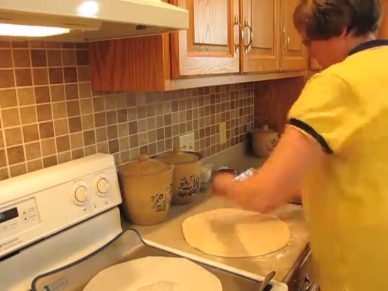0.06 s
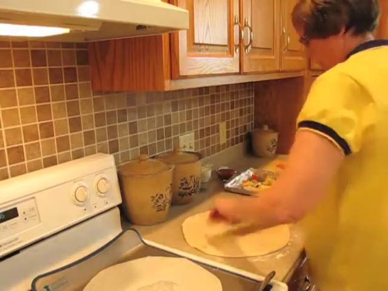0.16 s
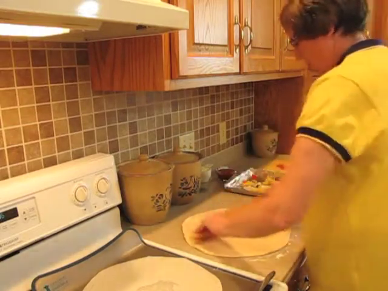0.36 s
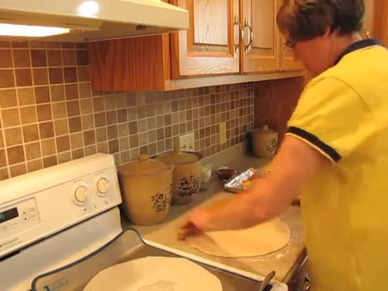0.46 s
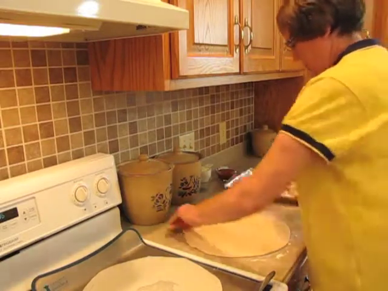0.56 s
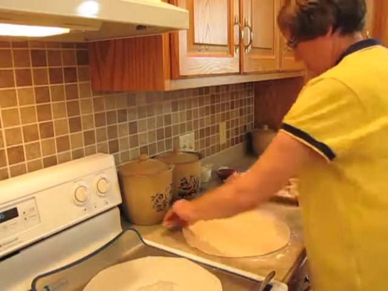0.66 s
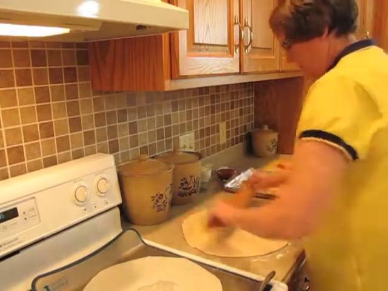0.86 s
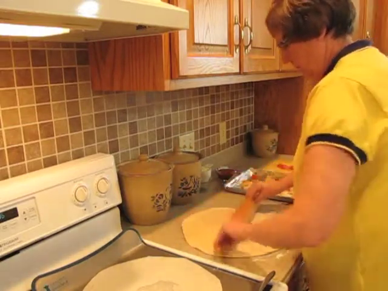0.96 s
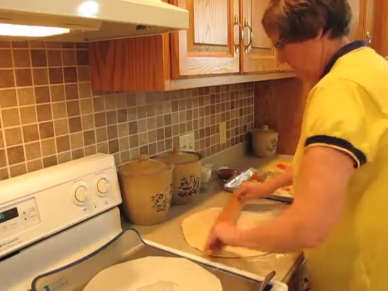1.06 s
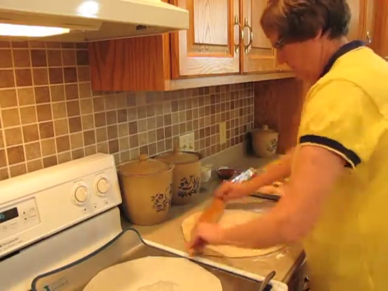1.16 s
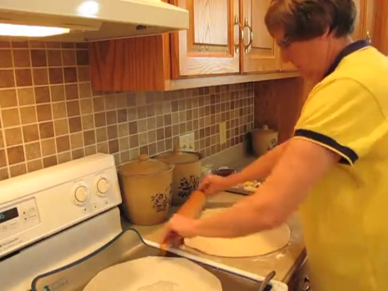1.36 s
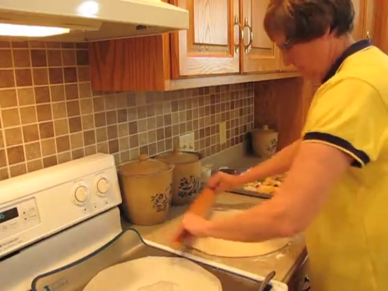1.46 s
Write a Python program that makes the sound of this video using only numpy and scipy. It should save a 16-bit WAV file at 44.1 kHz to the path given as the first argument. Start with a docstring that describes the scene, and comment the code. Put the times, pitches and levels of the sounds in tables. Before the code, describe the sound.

A wooden rolling pin rattles lightly at its loose handles from 0.03 to 0.13 seconds, then hits the counter with a loud, sharp knock at 0.24. Quiet grainy rolling follows with faint ticks and a clack near 0.66. After a lull, it lands softly on dough with a handle clatter at 1.0, then rolls with low rumble, rapid ticks and clacks until about 1.33, fading. Short tiled-kitchen echo, faint room tone.

```python
"""Rolling pin on a kitchen counter

A wooden pin strikes the counter once (wood modes, a swing of the top, noise crack), rolls, is lifted,
lands softly on dough (slow-attack counter modes) and rolls again (grainy noise, rumble).
Loose handles clack and the axle ticks: flurries of contacts excite handle modes and clicks.
Decaying stereo noise is the tiled kitchen's echo; steady noise is the room tone."""
import sys
import numpy as np
from scipy import signal
from scipy.fft import rfft, irfft, next_fast_len
from scipy.io import wavfile
from scipy.ndimage import uniform_filter1d

SR = 44100
rng = np.random.default_rng(int(sys.argv[2]) if len(sys.argv) > 2 else 0)


def master(y):
    """Save y as 16-bit WAV."""
    cut = np.clip(np.atleast_2d(y).T, -1, 1)
    pcm = np.round(cut * 32767)  # scale
    wavfile.write(sys.argv[1], SR, pcm.astype(np.int16))


N = 66150  # samples
T = np.arange(SR // 2) / SR  # s, time axis of one event


def amp(db):
    """Decibels to gain."""
    return 10 ** (np.asarray(db) / 20)


def unit(x):
    """Scale to rms 1."""
    return x / np.sqrt(np.mean(x ** 2) + 1e-20)


def along(points, hz):
    """Interpolate (f/Hz, value) points on a log frequency axis."""
    f, v = np.transpose(points)
    return np.interp(np.log(hz + 1), np.log(f + 1), v)


def filtered(x, gain):
    """Apply a zero-phase gain(hz) by FFT."""
    n = x.shape[-1]
    m = next_fast_len(n + 8192)
    return irfft(rfft(x, m) * gain(np.fft.rfftfreq(m, 1 / SR)), m)[..., :n]


def coloured(x, points):
    """Filter x through (f/Hz, gain/dB) points."""
    return filtered(x, lambda hz: amp(along(points, hz)))


def noise(points, size):
    """Two independent coloured noises, joint rms 1."""
    return unit(coloured(rng.standard_normal((2, size)), points))


EVEN_HZ = 500  # spectral smoothing width


def evened(x):
    """Random burst with its broad spectrum flattened and its fine detail kept; energy near 1."""
    z = rfft(x)
    smooth_bins = int(EVEN_HZ * x.shape[1] / SR)
    power = uniform_filter1d(np.abs(z) ** 2, size=smooth_bins, axis=1)
    return irfft(z / np.sqrt(np.abs(power) + 1e-12), x.shape[1])


def fade(t60_s):
    """Exponential decay, 60 dB in t60_s."""
    return amp(-60 * T / t60_s)


SIDE_PHASE_SCATTER_RAD = 0.25


def ring(modes):
    """Damped sine modes as mid and side; the side is near quadrature, leading or lagging at random."""
    draws = rng.standard_normal((len(modes), 2))
    lead = np.sign(draws[:, 0]) * np.pi / 2 + SIDE_PHASE_SCATTER_RAD * draws[:, 1]
    total = np.zeros((2, len(T)))
    for k, (hz, db, t60) in enumerate(modes):
        phase = 2 * np.pi * hz * T
        mid = np.sin(phase)
        side = np.sin(phase + lead[k]) * (1 - np.exp(-2 * hz * T))
        total += (-1) ** k * amp(db) * fade(t60) * np.array([mid, side])
    return total


def add(track, s, sound):
    """Mix a sound in at time s."""
    part = track[:, round(s * SR):][:, :sound.shape[1]]
    part += sound[:, :part.shape[1]]


# room tone: f/Hz, relative density/dB
AIR = [(20, -0.5), (50, -2), (120, 7), (400, 3), (1000, 2.5), (2800, -6), (5000, -4.5), (9000, -7),
       (15000, -25)]
AIR_DB = -62


def air():
    """Room tone: steady coloured noise."""
    return amp(AIR_DB) * noise(AIR, N)


RUB_GRAIN, RUB_RING_DB = 0.39, -7.5  # grain: sd of log amplitude
RUMBLE_START_S, RUMBLE_END_S, RUMBLE_RELEASE_T60_S, RUMBLE_DB = 1.005, 1.293, 0.24, -56.5
LANDING_ATTACK_S = 0.0046
# handle modes: f/Hz, level/dB, t60/s
HANDLE = [(1060, -32, 0.075), (1512, -8.5, 0.026), (1978, -8, 0.04), (2170, -21.5, 0.0417),
          (2432, -3.5, 0.0277), (2588, -0.5, 0.056), (2800, 0.5, 0.022), (3072, 1.5, 0.024),
          (3522, -13.5, 0.06), (4670, -11.5, 0.021), (5130, -8, 0.059), (5917, -2.5, 0.019),
          (7330, -12, 0.043), (8400, -9, 0.02)]
# axle rub envelope: t/s, level/dB
ROLL = [(0, -49), (.13, -51), (.23, -56), (.33, -48.5), (.5, -49.5), (.64, -54.5), (.7, -51.5), (.8, -61.5),
        (.88, -60), (1.0, -70), (1.025, -34.5), (1.09, -46.5), (1.2, -45), (1.31, -42), (1.38, -44),
        (1.42, -55), (1.5, -50)]
# axle rub spectrum: f/Hz, relative density/dB
RUB = [(100, -28), (300, 1), (560, 7.5), (800, -2.5), (1120, 8.5), (1350, 3.5), (2100, 2), (2600, 13),
       (3100, 6.5), (4300, 0), (5200, -1.5), (6600, -3.5), (8000, 1), (11000, -7), (15500, -13)]
# pressed dough spectrum: f/Hz, relative density/dB
RUMBLE = [(25, -9), (45, 3), (80, 2), (130, -5), (220, 5.5), (400, 1), (900, -30), (3000, -50)]


def rolling():
    """Axle friction: grainy noise, heard directly and ringing the handles, over a low dough rumble."""
    t = np.arange(N) / SR
    grain_log = np.repeat(rng.standard_normal(N), 64)[:N]  # held for 64 samples
    grains = rng.standard_normal((2, N)) * np.exp(RUB_GRAIN * grain_log)
    ringing = unit(signal.fftconvolve(grains, ring(HANDLE), axes=1)[:, :N])
    friction = unit(coloured(grains[::-1], RUB))
    rub = amp(np.interp(t, *np.transpose(ROLL))) * (friction + amp(RUB_RING_DB) * ringing)
    attack = np.clip((t - RUMBLE_START_S) / LANDING_ATTACK_S, 0, 1)
    release = amp(-60 * np.maximum(t - RUMBLE_END_S, 0) / RUMBLE_RELEASE_T60_S)
    return rub + amp(RUMBLE_DB) * attack * release * noise(RUMBLE, N)


ROOM_BUILD_S = 0.0044  # time constant
# kitchen decay: f/Hz, t60/s
KITCHEN_T60 = [(100, 0.41), (400, 0.57), (1000, 0.71), (2800, 0.64), (7000, 0.46), (14000, 0.25)]


def room_tail():
    """Diffuse echo of tiles and cupboards: noise with frequency-dependent decay, from near rms 1."""
    hz, t, z = signal.stft(rng.standard_normal((2, len(T))), SR, nperseg=256)
    decay = amp(-60 * t / along(KITCHEN_T60, hz)[:, None])
    tail = signal.istft(z * decay, SR, nperseg=256)[1]
    return tail[:, :len(T)] * (1 - np.exp(-T / ROOM_BUILD_S))


HANDLE_ECHO_DB = -4
# clatter as the room returns it: f/Hz, gain/dB
HANDLE_ROOM = [(100, -27), (330, -17), (520, -12), (760, -14), (1100, -8.5), (1600, -9), (2150, -8.5),
               (2550, 1.5), (3050, 0.5), (3500, -11.5), (4300, -17.5), (5200, -6), (5900, -7.5),
               (6600, -17.5), (8000, -12.5), (10500, -20), (15000, -32)]


def kitchen_echo(sound, colour):
    """Fresh, dense room tail scaled to a share of one clatter's energy."""
    tail = filtered(room_tail(), lambda hz: amp(along(HANDLE_ROOM, hz) + along(colour, hz)))
    return amp(HANDLE_ECHO_DB) * np.linalg.norm(sound[0]) * tail / np.linalg.norm(tail[0])


LEAD = 256  # samples before the first contact
CONTACTS_PER_S, FIRST_CONTACT_GAIN = 700, 1.06
GRIP_DETUNE = .012  # relative sd: hands shift the ring from flurry to flurry
CLICK_DB, CLICK_T60_S = -5, .008
# dry contact click: f/Hz, relative density/dB
CLICK = [(100, -23), (350, -9.5), (700, 1.5), (1400, -3), (2800, 9.5), (4200, -3), (8000, -4), (11000, -11),
         (15000, -14)]


def rattle(length_s, colour):
    """Flurry of handle-axle contacts, each a ring plus click; energy of rms 1 over length_s."""
    draws = rng.random((40, 3))
    when = (np.arange(len(draws)) + draws[:, 0] - draws[0, 0]) / CONTACTS_PER_S
    strength = draws[:, 1:].T
    sizes = np.sign(strength - .5) * (.5 + strength) / (1 + (when / length_s) ** 6)
    sizes[:, 0] *= FIRST_CONTACT_GAIN
    index = LEAD + (when * SR).astype(int)
    contacts = evened(np.array([np.bincount(index, size, len(T)) for size in sizes]))

    detune = 1 + GRIP_DETUNE * rng.standard_normal(len(HANDLE))
    gripped = [(hz * d, db, t60) for (hz, db, t60), d in zip(HANDLE, detune)]
    burst = evened(rng.standard_normal((2, len(T))) * fade(CLICK_T60_S))
    click = coloured(burst[:, :LEAD], CLICK)
    click = np.pad(click, ((0, 0), (0, len(T) - LEAD)))
    contact = unit(ring(gripped)) + amp(CLICK_DB) * unit(click)

    sound = coloured(signal.fftconvolve(contacts[:, :len(T) // 2], contact, axes=1), colour)
    return sound / np.linalg.norm(sound, axis=1, keepdims=True) * np.sqrt(length_s * SR)


BARREL_ATTACK_S, TICK_LENGTH_S = 0.0047, 0.0069
# handle clacks: t/s, level/dB, rattle length/s, barrel note re level/dB, middle gain/dB, treble gain/dB
CLACKS = [(0.028, -47.5, 0.036, -32, 11.5, 1.5), (0.0507, -30, 0.014, -23, 3, -7.5),
          (.078, -44, 0.0081, -16, 13, 17), (0.098, -52, 0.028, -19, -14, -22),
          (.1346, -49, 0.0074, -25, -13, -11), (0.6643, -29, 0.014, -16, -5.5, -2),
          (0.808, -37.5, .009, -14.5, 8.5, 0.5), (1.002, -31.5, 0.011, -26.5, -3, -1),
          (1.007, -24.5, 0.012, -21, 4, 3), (1.068, -35, 0.011, -13, -5, -6),
          (1.2262, -34.5, 0.011, -5, -4.5, -2), (1.333, -28.5, .015, -14.5, 2.5, -0.5)]
# hollow barrel modes: f/Hz, level/dB, t60/s
BARREL = [(496, -4, 0.096), (533.5, -2, 0.13)]
# axle ticks: t/s, level/dB, treble gain/dB
TICKS = [(0.202, -46, 2), (.454, -47.5, 22), (.488, -45, 8), (0.5279, -43.5, 9), (.587, -39, -3),
         (0.633, -47, 15), (0.7925, -39.5, 6), (1.1066, -34, 2.5), (1.120, -41, 1), (1.154, -36, 6.5),
         (1.177, -37, -4), (1.203, -34, 4.5), (1.2561, -36, 65), (1.279, -38.5, 3), (1.2979, -37, 26),
         (1.317, -38, -9), (1.479, -40, 3)]
# tick colour: f/Hz, gain/dB
TICK_COLOUR = [(400, -23), (1500, 5), (2800, 1), (3800, 17.5), (5000, 4.5), (8000, 12.5), (14000, 10)]
# the clatter carries little bass: f/Hz, gain/dB
HANDLE_LOW_CUT = [(60, -38), (200, -10), (330, 3.5), (480, 0)]


def handles():
    """Loose handles clack and the turning axle ticks: contact flurries with echoes; clacks ring the barrel."""
    out, flurries = np.zeros((2, N)), []
    for s, db, length, barrel_db, middle_db, treble_db in CLACKS:
        colour = [(1900, middle_db), (2500, 0.0046), (3200, 0), (5000, treble_db)]
        flurries.append((s, db, length, colour))
        add(out, s, amp(db + barrel_db) * ring(BARREL) * (1 - np.exp(-T / BARREL_ATTACK_S)))
    for s, db, treble_db in TICKS:
        colour = [(hz, level + treble_db * (hz > 4400)) for hz, level in TICK_COLOUR]
        flurries.append((s, db, TICK_LENGTH_S, colour))
    for s, db, length, colour in flurries:
        sound = amp(db) * rattle(length, colour)
        add(out, s - LEAD / SR, sound)
        add(out, s + length / 2, kitchen_echo(sound, colour))
    return coloured(out, HANDLE_LOW_CUT)


def kitchen(pair):
    """Room response: the mid signal convolved with a unit-energy tail."""
    tail = room_tail()
    return signal.fftconvolve(pair[:1], tail / np.linalg.norm(tail[0]), axes=1)[:, :N]


KNOCK_S, WOOD_DB = .2391, -13
PUSH_HZ, PUSH_PEAK_S, PUSH_DB = 846, 0.00054, 0  # first swing; envelope peak time
THUMP_DB, THUMP_TAU_S = -20, .0013  # counter gives under the blow
CRACK_DB, CRACK_T60_S, CRACK_DELAY_S = -10.5, 0.042, 0.000992
KNOCK_ECHO_DB, KNOCK_RING_ECHO_DB = -27.5, -15
# pin and counter modes: f/Hz, level/dB, t60/s
WOOD = [(204.3, -25.5, 0.25), (395, -33, 0.33), (550, -14, 0.16), (720, -21, 0.16), (1064, 1.5, 0.057),
        (1122, -1.5, 0.1), (1200, -11.5, 0.085), (1410, -18, 0.051), (1559, -1, 0.096), (1777, -2.5, 0.073),
        (2024, -4.5, 0.081), (2240, -7.5, 0.046), (2560, -10, .055), (2670, 3, .07), (3003, -3.5, 0.0596),
        (3470, -9, 0.096), (3630, -20, 0.117), (4145, -11, 0.076), (7290, -14, 0.022), (9020, -23, 0.042)]
# splintery contact noise: f/Hz, relative density/dB
CRACK = [(60, -35), (150, -2), (400, 2.5), (1000, 0), (3000, 0), (5000, -12), (6500, -12.5), (7500, -4.5),
         (9500, -17.5), (13000, -23), (16000, -38.5)]
# counter's radiation into the room: f/Hz, gain/dB
KNOCK_ROOM = [(35, -16), (70, -16.5), (140, -21), (210, -7), (280, -4.5), (390, 1), (600, -2), (850, -1),
              (1200, 2.5), (1600, -2), (2200, -5), (2800, -3.5), (3600, -13.5), (5000, -22), (6600, -22.5),
              (7700, -19.5), (10000, -23), (15000, -40.5)]


def knock():
    """Hard blow: swing and give of the counter top, a noise crack, wood modes and the room's answer."""
    out = np.zeros((2, N))
    swing_envelope = T / PUSH_PEAK_S * np.exp(1 - T / PUSH_PEAK_S)
    push = -amp(PUSH_DB) * swing_envelope * np.sin(2 * np.pi * PUSH_HZ * T)
    push += amp(THUMP_DB) * (1 - T / THUMP_TAU_S / 2) * np.exp(-T / THUMP_TAU_S)
    wood = amp(WOOD_DB) * ring(WOOD) * (1 - np.exp(-T / PUSH_PEAK_S))
    add(out, KNOCK_S, wood + np.outer([1, 0], push))  # push in mid only
    crack = amp(CRACK_DB) * noise(CRACK, len(T)) * fade(CRACK_T60_S)
    add(out, KNOCK_S + CRACK_DELAY_S, crack)
    out += amp(KNOCK_RING_ECHO_DB) * kitchen(out)
    echo = coloured(room_tail(), KNOCK_ROOM)
    add(out, KNOCK_S, amp(KNOCK_ECHO_DB) * echo / np.std(echo[0, :SR // 6]))
    return out


# soft landings: t/s, level/dB
LANDINGS = [(1.002, -36.5)]
# modes of the counter under the dough: f/Hz, level/dB, t60/s
COUNTER = [(40.3, -6.5, 0.49), (127.8, 1, 0.28), (192, 6, 0.11), (228.6, 0.5, 0.19), (592, -0.5, 0.23),
           (1156, -5, 0.24), (1574, -18, 0.17), (1697, 3.5, 0.12), (1890, 7, 0.11)]


def landings():
    """Dough-cushioned thud: counter modes with a slow attack."""
    out = np.zeros((2, N))
    for s, db in LANDINGS:
        add(out, s, amp(db) * ring(COUNTER) * (1 - np.exp(-T / LANDING_ATTACK_S)))
    return out


# stereo width: f/Hz, side gain/dB
WIDTH = [(60, -21), (380, -14), (700, -10), (1300, -8), (2400, -3.5), (4400, -2.5), (8000, -0.5),
         (15000, 1.5)]
# stereo balance: f/Hz, left minus right/dB
BALANCE_DB = [(400, 0), (900, -0.5), (1900, -1), (2800, -1.5), (4000, -.5), (5500, 0.1), (9000, -0.5)]


def stereo(pair):
    """Mid/side to left/right: narrow bass, wide treble, mostly slightly right."""
    mid, side = pair[0], coloured(pair[1], WIDTH)
    left_right = np.array([mid + side, mid - side])
    return filtered(left_right, lambda hz: amp(np.outer([.5, -.5], along(BALANCE_DB, hz))))


KNOCK_SIDE_DB, LANDING_SIDE_DB, LANDING_ECHO_DB = -0.5, -23, -6


def scene():
    """Sum pin, handles, counter and room tone; decode to stereo."""
    thud = landings() * amp([[0], [LANDING_SIDE_DB]])
    thud_echo = amp(LANDING_ECHO_DB) * kitchen(thud)
    blow = knock() * amp([[0], [KNOCK_SIDE_DB]])
    return stereo(air() + rolling() + handles() + blow + thud + thud_echo)


TOP_HZ = 15700


def record(dry):
    """Round off peaks near full scale, then low-pass steeply at TOP_HZ."""
    clipped = dry / (1 + np.abs(dry) ** 8) ** (1 / 8)
    return filtered(clipped, lambda hz: 1 / np.sqrt(1 + (hz / TOP_HZ) ** 160))


dry = scene()
out = record(dry)
master(out)
```